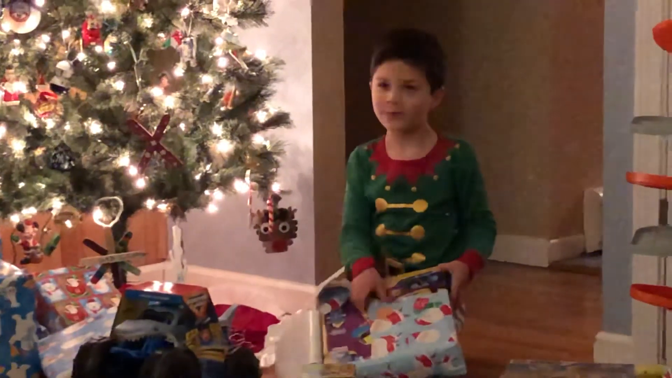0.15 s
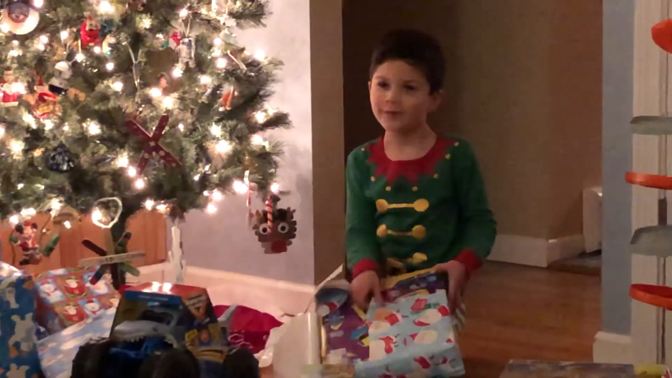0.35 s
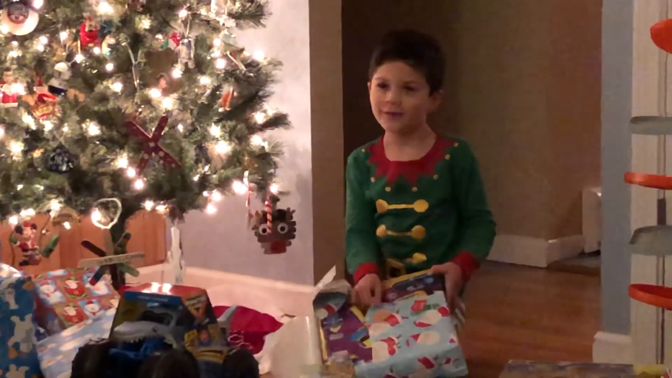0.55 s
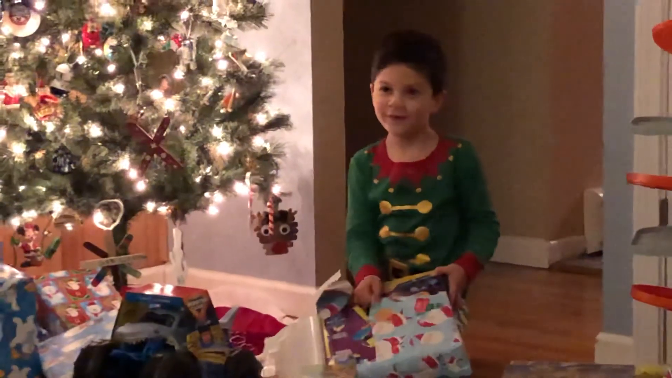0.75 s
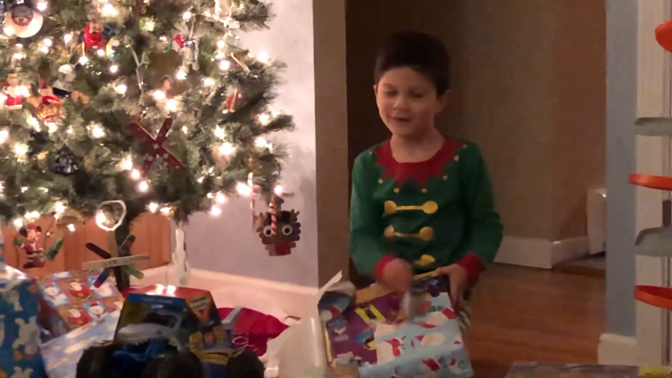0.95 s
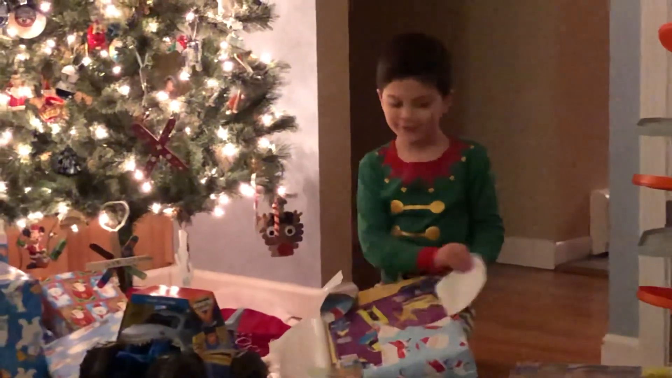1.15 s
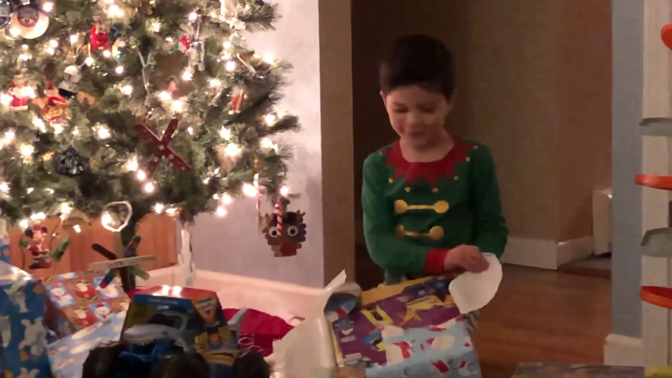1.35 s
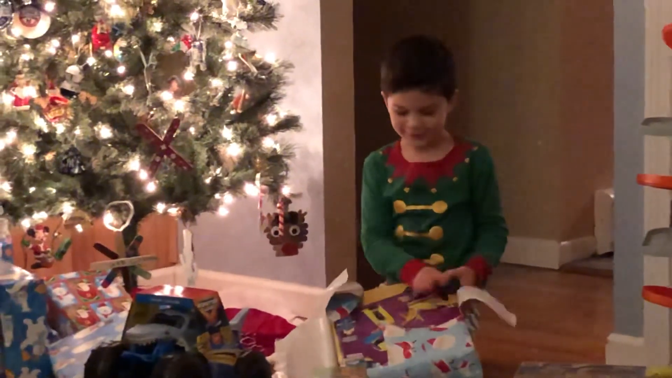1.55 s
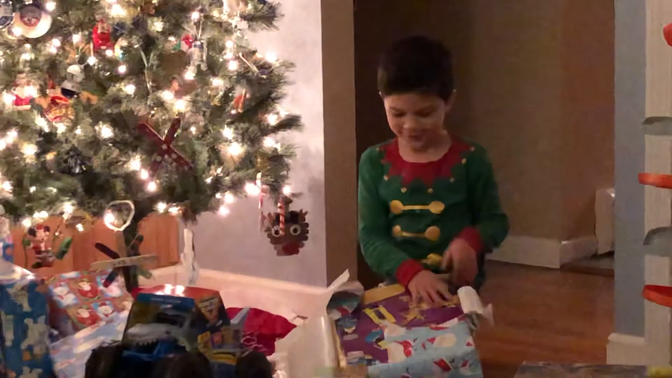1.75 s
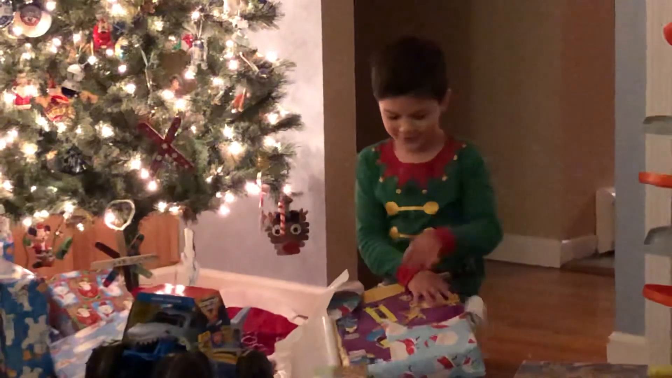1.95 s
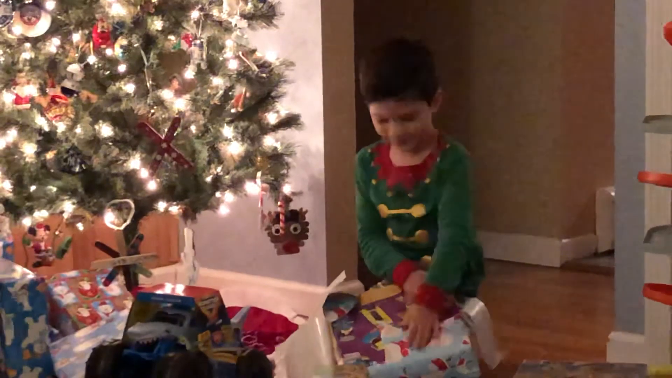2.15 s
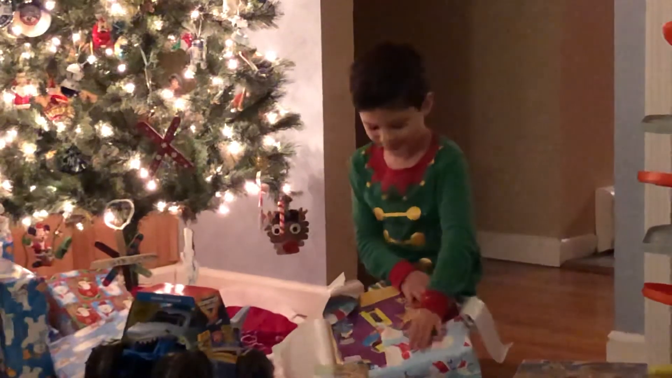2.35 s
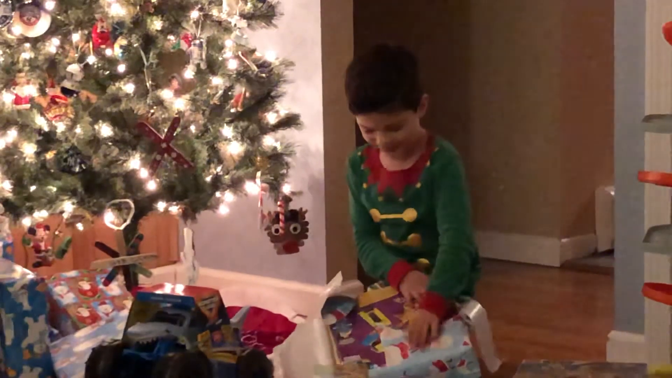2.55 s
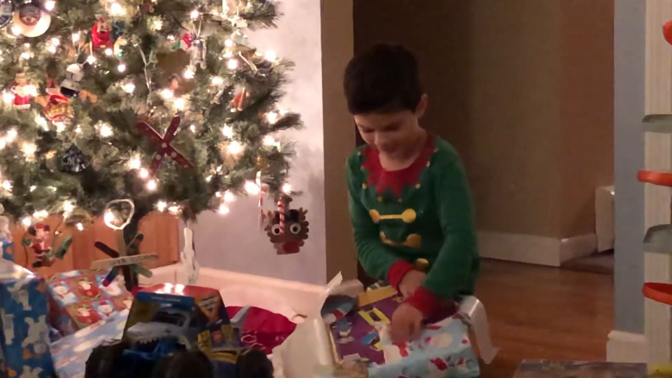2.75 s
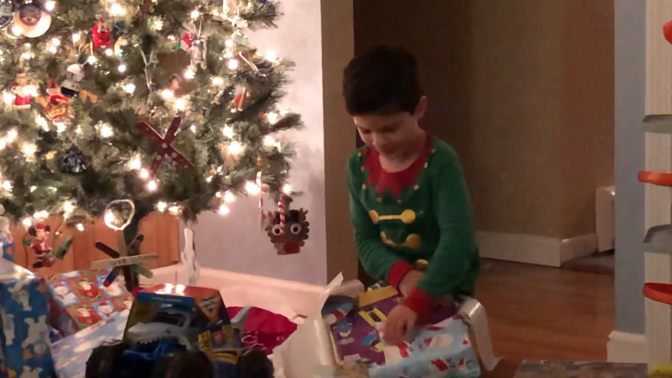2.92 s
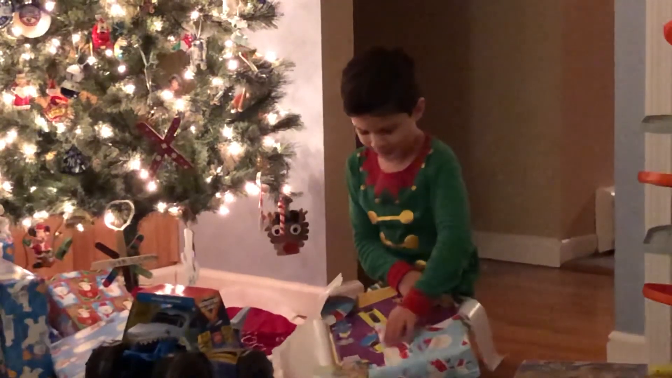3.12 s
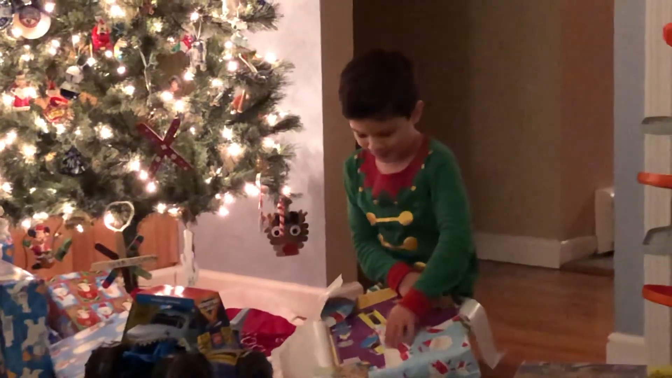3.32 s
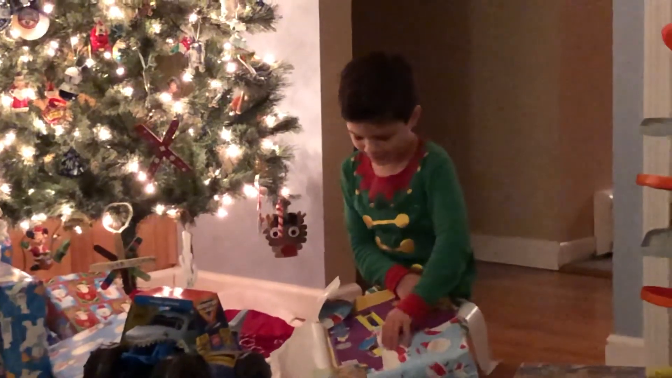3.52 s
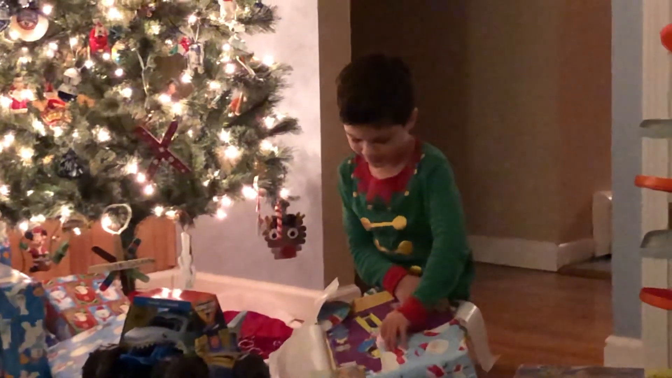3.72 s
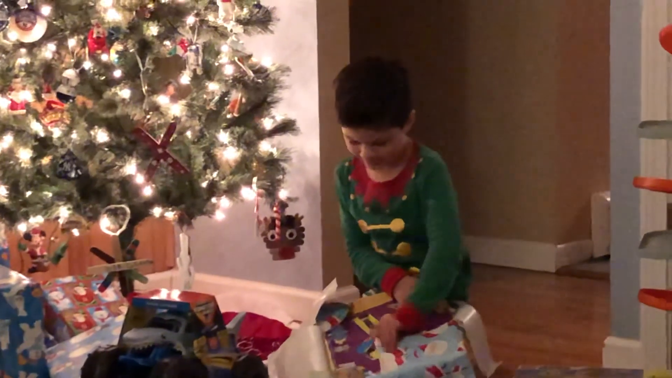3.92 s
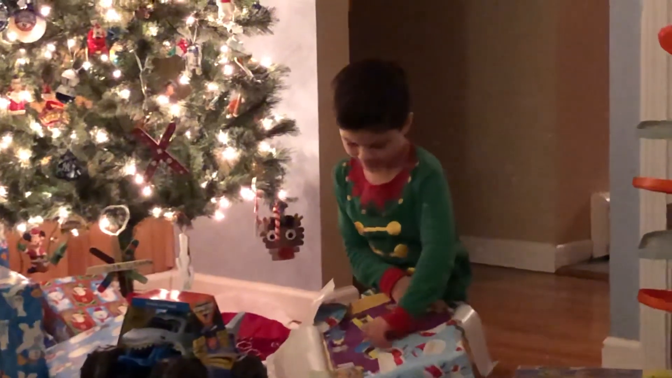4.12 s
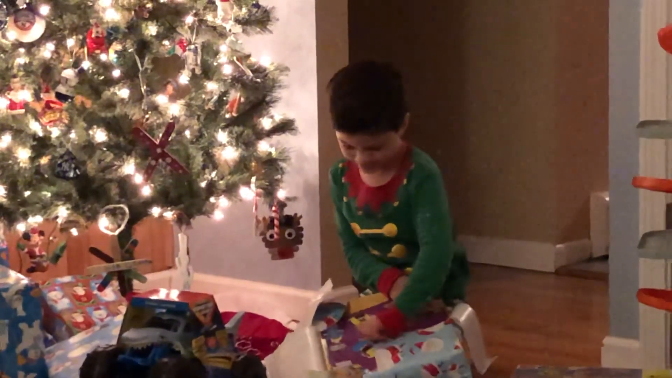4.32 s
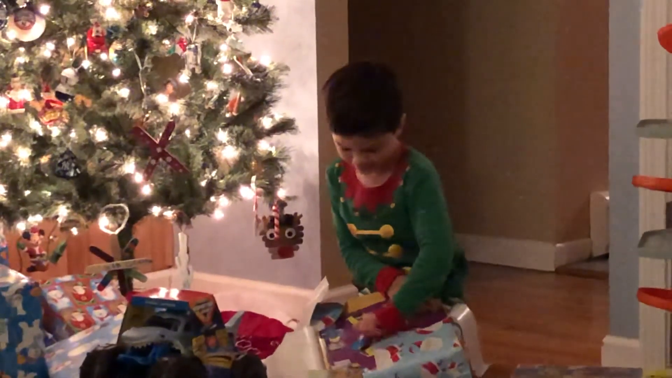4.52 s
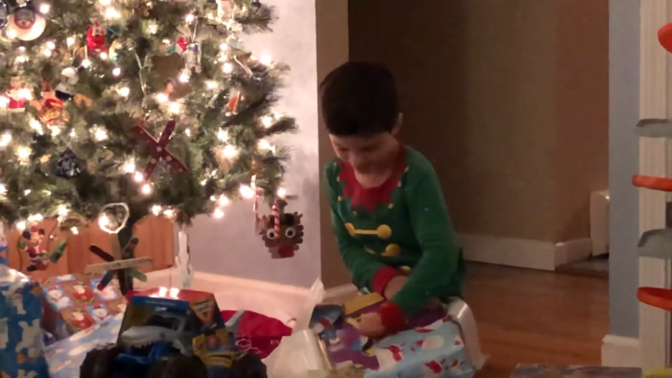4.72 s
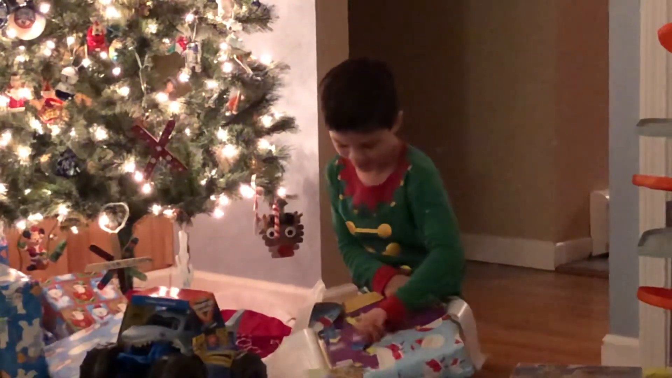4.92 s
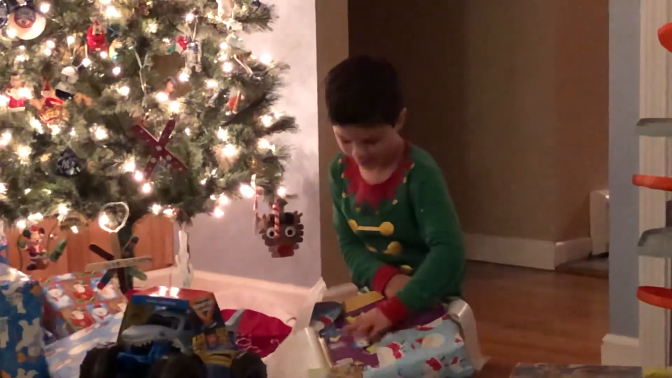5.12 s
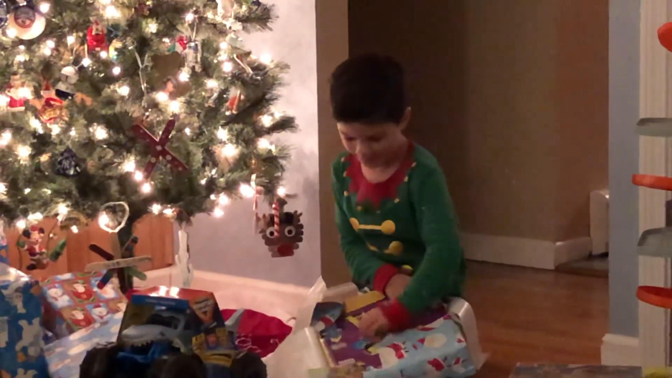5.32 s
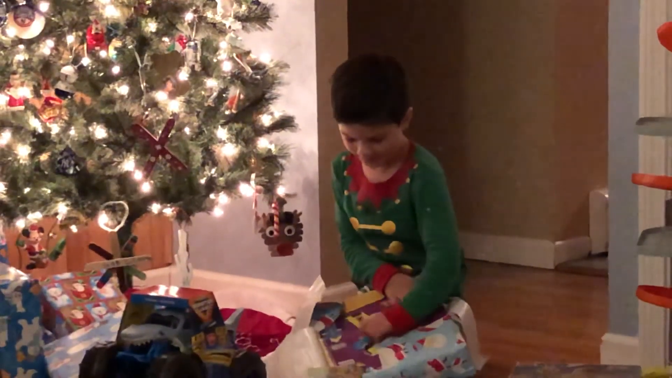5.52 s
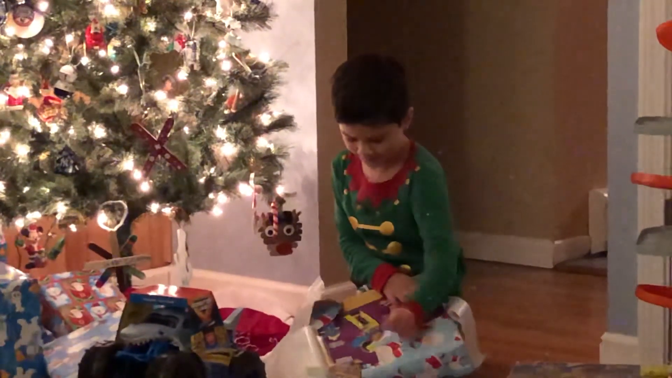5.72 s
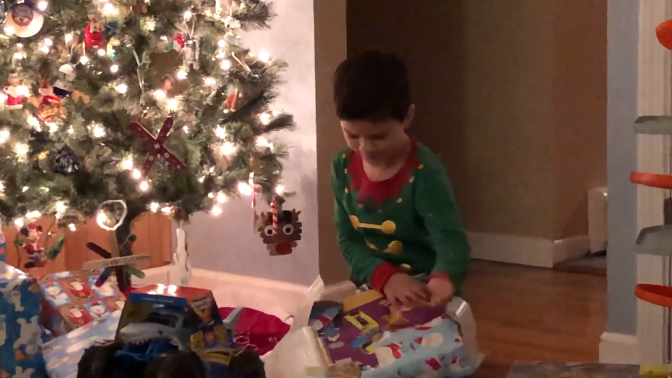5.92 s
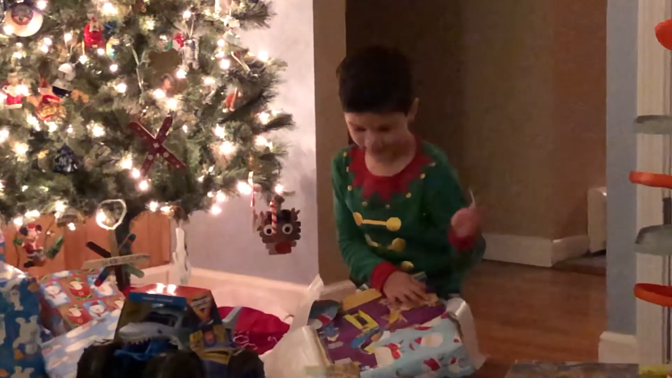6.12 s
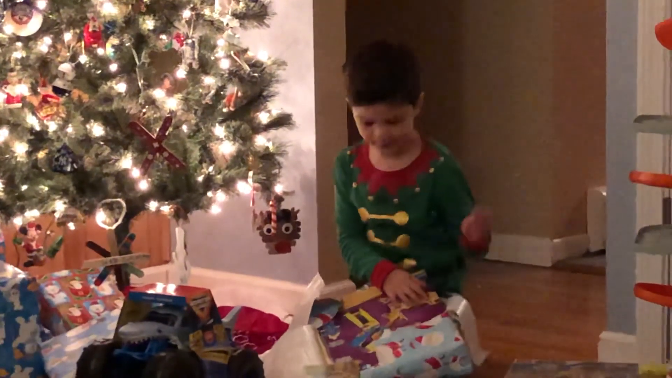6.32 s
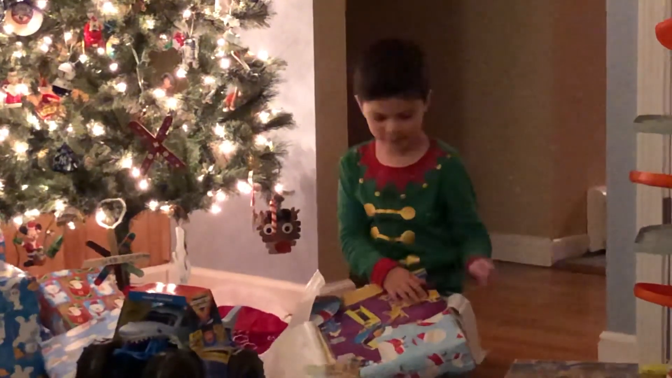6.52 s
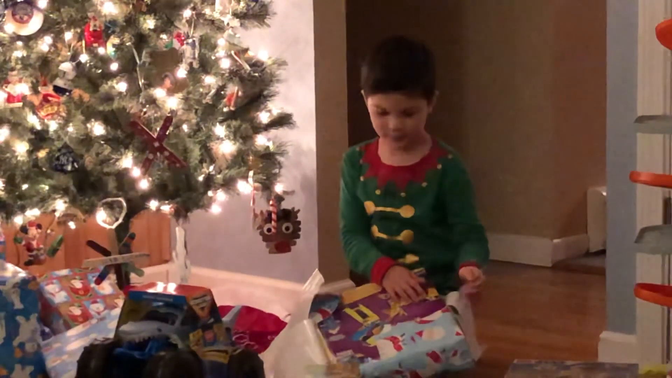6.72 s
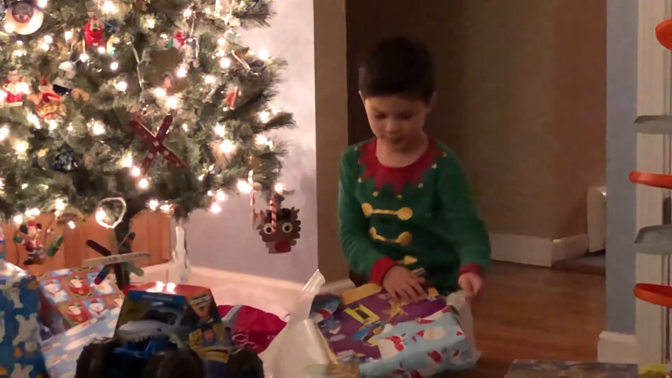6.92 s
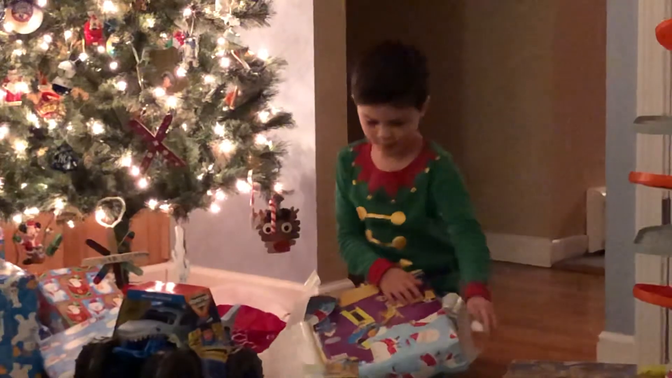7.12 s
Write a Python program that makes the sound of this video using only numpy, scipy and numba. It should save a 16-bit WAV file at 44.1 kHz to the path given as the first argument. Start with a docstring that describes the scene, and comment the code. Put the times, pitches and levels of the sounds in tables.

```python
"""Paper rips, peels and pops as a child unwraps a cardboard box on the floor of a quiet living room.
One fast rip, some fumbling, a slow strip peeled off the lid, then taut paper gives way with a pop.
Breaking fibres are trains of random clicks, and buckling creases are short bursts, both through filters.
Fingers scuff, chirp and judder by stick-slip friction; the hollow box rumbles and thuds in its modes.
Paper and fingers sound in a reverberant room, over steady soft noise."""
import sys
import numpy as np
from scipy import signal
from scipy.fft import rfft, irfft
from scipy.io import wavfile
from scipy.ndimage import uniform_filter1d
from numba import njit

SR = 44100
rng = np.random.default_rng(int(sys.argv[2]) if len(sys.argv) > 2 else 0)


def master(y):
    """Save y as 16-bit WAV."""
    cut = np.clip(np.atleast_2d(y).T, -1, 1)
    pcm = np.round(cut * 32767)  # scale
    wavfile.write(sys.argv[1], SR, pcm.astype(np.int16))


N = 315756  # length in samples


def from_db(db):
    """Logarithmic level: decibels become an amplitude gain."""
    return 10 ** (np.asarray(db) / 20)


def rms_one(x):
    """Normalisation of mean power: scale to rms 1."""
    return x / np.sqrt(np.mean(x ** 2) + 1e-20)


def at_hz(points, hz):
    """Interpolation along a logarithmic frequency axis."""
    f, value = np.transpose(points)
    return np.interp(np.log(np.maximum(hz, 1)), np.log(f), value)


def drift(rate):
    """Slow random modulation: a wander of rms 1 through `rate` random points a second."""
    knots = rng.standard_normal(int(N / SR * rate) + 2)
    position = np.arange(N) / SR * rate
    return rms_one(np.interp(position, np.arange(len(knots)), knots))


def through(x, response):
    """Linear superposition: convolve with an impulse response."""
    return signal.fftconvolve(x, response)[:N]


def colour(x, spectrum, size=8192):
    """Minimum-phase filtering: a causal response of unit energy that falls away below its first point."""
    hz = np.arange(size // 2 + 1) * SR / size
    bass_fall = np.clip(hz / spectrum[0][0], 1 / 20, 1) ** 2
    gain = from_db(at_hz(spectrum, hz)) * bass_fall
    # folding the cepstrum onto positive times makes the phase minimal
    cepstrum = irfft(np.log(gain))
    cepstrum[1:size // 2] *= 2
    cepstrum[size // 2 + 1:] = 0
    response = irfft(np.exp(rfft(cepstrum)))
    return through(x, response / np.linalg.norm(response))


def ring(x, hz, t60):
    """Damped resonance: a unit click sets a sine of initial height 1 ringing."""
    r = from_db(-60 / (t60 * SR))
    w = 2 * np.pi * hz / SR
    return signal.lfilter([0, np.sin(w)], [1, -2 * r * np.cos(w), r * r], x + 1e-18)


@njit
def moving_resonance(x, hz, width):
    """Resonance with a moving centre, of gain 1; centre and width are shares of the sample rate."""
    out, state, r = np.zeros(len(x)), 0j, np.exp(-np.pi * width)
    for i in range(len(x)):
        state = state * r * np.exp(2j * np.pi * hz[i]) + x[i]
        out[i] = 2 * (1 - r) * state.real
    return out


def sing(x, pitch_hz, modes):
    """Modal resonance of paper: all its modes follow one moving pitch; rms 1."""
    voice = np.zeros(N)
    for multiple, width_hz, db in modes:
        voice += from_db(db) * moving_resonance(x + 1e-18, multiple * pitch_hz / SR, width_hz / SR)
    return rms_one(voice)


def grains(per_s, spread_db, clump_db, clump_rate, size=2200):
    """Random impulse train: uneven clicks that come in clumps, levelled to rms 1 over each 50 ms."""
    sizes = from_db(spread_db * np.minimum(rng.exponential(1, N), 4)) * rng.choice([-1, 1], N)
    born = rng.random(N) < per_s / SR
    train = born * sizes * from_db(clump_db * drift(clump_rate))
    return train / np.sqrt(np.abs(uniform_filter1d(train ** 2, size)) + 1e-6)


def clicks(times, db):
    """Impulsive excitation: one click of the given height at each time."""
    out = np.zeros(N)
    out[np.round(times * SR).astype(int)] = from_db(db)
    return out


def gestures(rows, attack_s, release_s, sag_db_per_s, level_column=2):
    """Amplitude envelope: each hand movement builds up around its start, slackens and dies away."""
    t, out = np.arange(N) / SR, np.zeros(N)
    for row in rows:
        start, length, db = row[0], row[1], row[level_column]
        live = slice(*np.searchsorted(t, [start - attack_s / 2, start + length + 10 * release_s]))
        age = t[live] - start
        hold = from_db(db - sag_db_per_s * (age - length / 2))
        rise = np.minimum(age / attack_s + .5, 1)
        decay = np.exp(-np.maximum(age - length, 0) / release_s)
        out[live] += hold * rise * decay
    return out


# Decay of the room. Each row: frequency in Hz, reverberation time t60 in s.
ROOM_DECAY = [(150, 0.3), (1000, 0.41), (4500, 0.31), (9000, 0.23), (15000, 0.18)]


def diffuse_tail(build_s, size=22000):
    """Diffuse reverberation: noise of unit energy that builds up quickly and dies sooner in the treble."""
    t, tail = np.arange(size) / SR, np.zeros(size)
    edges = np.geomspace(60, 19000, 12)
    for low, high in zip(edges, edges[1:]):
        band_pass = signal.butter(2, [low, high], "band", fs=SR, output="sos")
        band = signal.sosfilt(band_pass, rng.standard_normal(size))
        tail += band * from_db(-60 * t / at_hz(ROOM_DECAY, np.sqrt(low * high)))
    tail *= 1 - np.exp(-t / build_s)
    return tail / np.linalg.norm(tail)


# Reflections off floor and furniture. Each row: delay in s, level in dB relative to the direct sound.
REFLECTIONS = [(.0021, -53), (.0047, -13.5)]


def room(x, tail_db, move_hz, count=4):
    """Reflection and reverberation: the paper moves, so the pattern of its reflections keeps changing."""
    shares = np.array([drift(move_hz) for _ in range(count)])
    shares /= np.linalg.norm(shares, axis=0)
    tail = from_db(tail_db) * sum(through(x * share, diffuse_tail(build_s=0.0013)) for share in shares)
    early = sum(from_db(db) * np.pad(x, (round(delay * SR), 0))[:N] for delay, db in REFLECTIONS)
    power = 1 + from_db(tail_db) ** 2 + sum(from_db(db) ** 2 for _, db in REFLECTIONS)
    return (x + early + tail) / np.sqrt(power)


# Colour of the background. Each row: frequency in Hz, relative spectral level in dB per Hz.
AIR_COLOUR = [(25, -9), (55, 0), (95, -2.5), (130, 0), (230, -1), (320, -5.5), (700, -12.5), (1100, -15),
              (2300, -21.5), (3700, -22.5), (8000, -28.5), (16000, -31.5)]
AIR_DB = -66.4  # level of the filtered noise


def still_air():
    """Stationary random noise: a steady soft background, strongest in the bass."""
    return from_db(AIR_DB) * colour(rng.standard_normal(N), AIR_COLOUR)


# Loose paper shifting under the hands. Each row: start in s, length in s, relative level in dB.
PAPER_SHIFTS = [(0.0, 0.28, -75), (0.18, 0.021, -67), (0.29, 0.15, -70), (0.645, 0.043, -79),
                (0.726, 0.02, -59), (1.35, 0.32, -82.5), (2.08, 0.1, -77), (2.25, 0.085, -70.5),
                (3.1, 0.037, -79), (3.45, 0.18, -84), (3.602, 0.022, -61.5), (4.5, 0.18, -75.5),
                (4.872, 0.023, -64), (4.95, 0.07, -74.5), (5.192, 0.0063, -56.5), (5.257, 0.071, -60.5),
                (5.32, 0.11, -75)]
# Colour of the brushing. Each row: frequency in Hz, relative spectral level in dB per Hz.
LOOSE_PAPER = [(900, 0.5), (1800, -3), (3000, -2), (4600, 2.5), (7000, -1), (10000, -4.5), (16000, -10.5)]


def rustle():
    """Granular friction: loose paper brushes against itself in fine grains."""
    brushing = grains(per_s=2200, spread_db=3.8, clump_db=2.2, clump_rate=60)
    shifting = gestures(PAPER_SHIFTS, attack_s=0.044, release_s=0.01, sag_db_per_s=0)
    return from_db(5.0) * colour(shifting * brushing, LOOSE_PAPER)


# Fingers sliding over the lid. Each row: start in s, length in s, relative level of the lid's drone in dB,
# relative level of the scuff in dB.
FINGER_STROKES = [(0.0, 0.0081, -68, -64.5), (0.063, 0.012, -64, -65.5), (0.16, 0.022, -66.5, -61),
                  (0.58, 0.33, -72.5, -70), (0.732, 0.028, -51.5, -51), (0.79, 0.36, -64, -61),
                  (1.13, 0.04, -58.5, -61), (1.37, 0.014, -67.5, -70.5), (1.545, 0.025, -68.5, -68),
                  (1.96, 0.095, -77.5, -77), (2.084, 0.058, -65.5, -65.5), (2.21, 0.025, -59.5, -66),
                  (2.312, 0.016, -59.5, -57.5), (2.37, 0.063, -74.5, -79), (3.14, 0.056, -76, -70.5),
                  (3.194, 0.011, -60.5, -59.5), (3.23, 0.035, -70, -80), (3.49, 0.091, -56.5, -62.5),
                  (3.665, 0.083, -59.5, -58.5), (3.78, 0.1, -63, -68), (3.895, 0.034, -58.5, -59),
                  (3.97, 0.16, -67.5, -68.5), (4.265, 0.1, -71, -67), (4.335, 0.098, -65, -68.5),
                  (4.49, 0.031, -58, -61), (4.55, 0.099, -62.5, -66), (4.872, 0.033, -75, -69),
                  (5.265, 0.29, -71, -69), (5.69, 0.019, -86, -72), (5.83, 0.0069, -63, -73),
                  (6.945, 0.059, -79, -66)]
# Colours of the lid and of the scuff. Each row: frequency in Hz, relative spectral level in dB per Hz.
LID_COLOUR = [(220, -12.5), (340, -1.5), (450, -11), (590, 1.5), (700, -1.5), (850, -4.5), (1200, -32.5),
              (3000, -45)]
SCUFF_COLOUR = [(600, -14), (900, -7.5), (1150, 1), (1700, -5), (2200, -12), (4000, -19), (9000, -35)]


def rub():
    """Stick-slip friction: fingers scuff the paper, and the lid drones as they press on it."""
    slips = grains(per_s=500, spread_db=4, clump_db=4, clump_rate=60)
    pressing = gestures(FINGER_STROKES, attack_s=0.052, release_s=0.022, sag_db_per_s=7, level_column=2)
    sliding = gestures(FINGER_STROKES, attack_s=0.036, release_s=0.017, sag_db_per_s=8, level_column=3)
    drone = from_db(4.5) * colour(pressing * slips, LID_COLOUR)
    scuff = from_db(2.7) * colour(sliding * slips, SCUFF_COLOUR)
    return drone + scuff


# Creases buckling and taut paper giving way. Each row: time in s, relative level of the snap in dB,
# of its dull part in dB, of its crisp part in dB, ringing frequency of the facet in Hz.
CREASE_SNAPS = [(0.18, -46.5, -62, -46.5, 4490), (0.1855, -51, -62, -67, 4470),
                (0.5274, -59.5, -70, -79, 4540), (0.634, -43, -58, -71, 3780),
                (0.739, -34.5, -44.5, -36, 3470), (1.4474, -63.5, -82, -81, 3600),
                (1.7679, -64.5, -63, -84, 1400), (1.7985, -80, -63.5, -84, 1400),
                (1.8178, -63, -68, -86, 1410), (1.9146, -65, -61, -81, 1490), (1.97, -66, -67, -80, 2000),
                (2.078, -49, -84, -63, 1400), (2.094, -51.5, -57.5, -74, 1490),
                (2.0976, -53, -69, -69, 5200), (2.1355, -51, -65, -70, 3500),
                (2.203, -43, -48.5, -62, 2970), (2.208, -57, -57, -63, 1600),
                (2.2226, -61, -53.5, -68, 1500), (2.237, -46, -56, -51, 4460),
                (2.2422, -61, -61, -72, 6360), (2.463, -65, -78, -82, 4000), (2.606, -67, -83, -70, 3650),
                (2.6326, -58, -68, -62.5, 3650), (3.1898, -57, -58, -80, 1820),
                (3.203, -59, -56.5, -79, 1700), (3.4323, -48.5, -54.5, -54.5, 4470),
                (3.6026, -49, -68, -47, 3980), (3.607, -54, -73, -49.5, 3400),
                (3.7323, -49.5, -59, -54, 3700), (3.7794, -47.5, -62, -47, 7020),
                (3.84, -52, -66, -43, 5250), (3.897, -44.5, -62, -52, 4200), (3.914, -44, -53.5, -48, 3380),
                (3.957, -41.5, -57, -42, 3340), (3.971, -44, -64, -60, 2100),
                (4.057, -41.5, -55, -58, 4400), (4.27, -44, -56.5, -60, 3470),
                (4.315, -49.5, -67, -62, 4300), (4.3443, -50, -68, -54, 3900),
                (4.9425, -55, -75, -51.5, 9100), (5.25, -44, -57.5, -44.5, 4700),
                (5.2765, -45.5, -52, -62, 1470), (5.2988, -53, -66, -45, 5070),
                (5.301, -43.5, -60, -33, 7950), (5.3048, -51, -65, -46, 5340),
                (5.39, -59, -57.5, -75, 2100), (5.43, -59, -64, -78, 2200), (5.465, -61, -63, -78, 1900),
                (5.4977, -58.5, -70, -64, 3500), (5.5761, -31.5, -39.5, -27.5, 5500),
                (5.5812, -36, -39.5, -44, 5835), (5.587, -33, -42.5, -38, 4250),
                (5.8244, -55, -66, -71, 4700), (6.686, -57.5, -88, -62, 3520)]
# Colours of the three parts. Each row: frequency in Hz, relative spectral level in dB per Hz.
DULL_COLOUR = [(200, 5.5), (400, -5), (620, 0.5), (750, -0.5), (1000, -1), (1500, -1), (2300, -17.5),
               (5000, -37.5)]
SNAP_COLOUR = [(700, -10), (1800, 9.5), (2600, 3), (3400, 6), (4500, 7.5), (6000, -8.5), (8000, -5.5),
               (14000, -18)]
CRISP_COLOUR = [(3500, -32.5), (6000, 13), (7500, 14.5), (10500, 13), (13000, 7), (16000, 5.5)]


def snaps(click_db, strain_s, shiver_s, ring_db, ring_cycles, size=2400, lead=200):
    """Snap-through buckling: a crease creaks under strain, flips with a click, then shivers and rings."""
    lag = (np.arange(size) - lead) / SR  # seconds from the flip
    dull, snap, crisp, rung = np.zeros((4, N))
    envelope = np.exp(np.minimum(lag / strain_s, -lag / shiver_s))
    shivers = rng.laplace(size=(len(CREASE_SNAPS), size)) * envelope
    for (s, snap_db, dull_db, crisp_db, hz), shiver in zip(CREASE_SNAPS, shivers):
        burst = shiver / np.linalg.norm(shiver)
        burst[lead] += from_db(click_db)
        ringing = ring(np.gradient(burst), hz, ring_cycles / hz)
        burst /= np.linalg.norm(burst)
        ringing /= np.linalg.norm(ringing)
        at = round(s * SR) - lead
        here = slice(at, at + size)
        dull[here] += from_db(dull_db) * burst
        snap[here] += from_db(snap_db) * burst
        crisp[here] += from_db(crisp_db) * burst
        rung[here] += from_db(ring_db + max(snap_db, crisp_db)) * ringing
    dull = from_db(28.5) * colour(dull, DULL_COLOUR)
    snap = from_db(19.5) * colour(snap, SNAP_COLOUR)
    crisp = from_db(23.0) * colour(crisp, CRISP_COLOUR)
    return dull + snap + crisp + rung


def creases(count=3):
    """Incoherent summation: several facets flip in each snap, each sounding into the room in its own way."""
    total = np.zeros(N)
    for _ in range(count):
        facet = snaps(click_db=-7.5, strain_s=0.00095, shiver_s=0.0029, ring_db=11.5, ring_cycles=16.5)
        total += room(facet, tail_db=1.2, move_hz=3, count=2)
    return total / np.sqrt(count)


# Modes of the hollow box. Each row: frequency in Hz, relative level in dB, decay time t60 in s.
BOX_MODES = [(126.4, -3, 0.28), (147.5, 1.5, 0.17), (187.6, -4.5, 0.28), (186, 1, 0.077),
             (220.3, 3.5, 0.096), (237.1, -3.5, 0.25), (354.4, -12.5, 0.27), (440.7, -11.5, 0.22),
             (572, -11, 0.46), (608, -10, 0.22), (648, -4.5, 0.16)]


def box(push, contact_hz):
    """Modal excitation: a push rings the modes of the hollow box; a soft contact spares the high ones."""
    soft = signal.sosfilt(signal.butter(1, contact_hz, fs=SR, output="sos"), push)
    out = np.zeros(N)
    for k, (hz, db, t60) in enumerate(BOX_MODES):
        sign = (-1) ** (k // 3)
        out += sign * from_db(db) * ring(soft, hz, t60)
    return out


# Hands tugging at the box. Each row: start in s, length in s, relative level in dB.
BOX_TUGS = [(0.63, 0.029, -57.5), (0.735, 0.061, -44.5), (0.79, 0.16, -49), (1.005, 0.038, -60),
            (1.55, 0.17, -63), (2.073, 0.038, -52.5), (2.13, 0.14, -62), (2.45, 0.94, -65),
            (3.436, 0.018, -53.5), (3.52, 0.22, -53.5), (3.715, 0.14, -54.5), (3.98, 0.098, -53),
            (4.3, 0.28, -57.5), (4.56, 0.11, -57), (5.103, 0.016, -58), (5.21, 0.13, -54.5),
            (5.375, 0.011, -51.5)]


def flex():
    """Forced vibration: the pull on the paper jerks the hollow box."""
    jerks = grains(per_s=600, spread_db=1.5, clump_db=3.5, clump_rate=35)
    pulling = gestures(BOX_TUGS, attack_s=0.007, release_s=0.044, sag_db_per_s=3.0)
    return from_db(-3.0) * pulling * rms_one(box(jerks, contact_hz=470))


# Bumps on the box. Each row: time in s, relative height of the impulse in dB.
BOX_BUMPS = [(0.741, -36), (0.778, -49), (2.072, -44), (2.706, -45.5), (3.436, -43), (5.213, -40.5),
             (5.583, -23.5), (5.624, -31.5)]


def bumps():
    """Impact excitation: sudden pulls and knocks thump the box."""
    s, height_db = np.transpose(BOX_BUMPS)
    return from_db(-13.5) * box(clicks(s, height_db), contact_hz=1240)


# Colours of the breaking fibres and of the sheet. Each row: frequency in Hz, relative level in dB per Hz.
FIBRE_COLOUR = [(1500, -22), (2700, -1.5), (4300, 6), (5000, 4.5), (6200, 2.5), (7500, 2.5), (10000, -1),
                (12000, -1), (16000, -9)]
SHEET_COLOUR = [(800, -15.5), (1300, -14), (1800, -5.5), (2500, -2), (3300, -6.5), (6000, -19)]


def tear(pulls, breaks, modes, flutter, crackle_db, flap_db, flap_swell_db, sheet_db, sheet_growth_db):
    """Fracture as excitation: breaking fibres crackle, and shake the fluttering free flap and the sheet."""
    t, effort, progress = np.arange(N) / SR, np.zeros(N), np.zeros(N)
    for rows in pulls:
        s, db, _ = np.transpose(rows)
        during = (t >= s[0]) & (t < s[-1])
        effort[during] = from_db(np.interp(t[during], s, db))
        progress[during] = (t[during] - s[0]) / (s[-1] - s[0])
    s, _, hz = np.vstack(pulls).T
    pitch_hz = np.interp(t, s, hz) * (1 + flutter * drift(30))
    flap = sing(breaks, pitch_hz, modes)
    crackle = from_db(crackle_db) * colour(breaks, FIBRE_COLOUR)
    # the flap's strength changes in mid-pull
    singing = from_db(flap_db + flap_swell_db * np.sin(np.pi * progress)) * flap
    # the sheet gains body as more of it comes free
    body = from_db(sheet_db + sheet_growth_db * progress) * colour(breaks, SHEET_COLOUR)
    return effort * (crackle + singing + body)


# The fast rip, one list per pull. Each row: time in s, relative level in dB, pitch of the free flap in Hz.
RIP_PULL = [
    [(0.742, -41, 3500), (0.768, -37.5, 3680), (1.066, -41, 3630), (1.188, -46.5, 3600), (1.24, -72, 3400)],
]
# Resonances of the wide flap. Each row: multiple of the pitch, width in Hz, relative level in dB.
FLAP_MODES = [(0.87, 304, -5), (0.99, 340, 0), (1.1, 300, 0.5)]


def rip():
    """Dense fracture: in a fast tear thousands of fibre breaks a second merge into a rasp."""
    breaks = grains(per_s=3500, spread_db=3.8, clump_db=2.4, clump_rate=170)
    return tear(RIP_PULL, breaks, FLAP_MODES, flutter=0.019, crackle_db=1.5,
                flap_db=-8.0, flap_swell_db=10.5, sheet_db=-14.5, sheet_growth_db=10.5)


# Skids of a fingertip along the papered edge. Each row: start in s, length in s, relative level in dB,
# pitch in Hz.
EDGE_SKIDS = [(2.323, 0.026, -55.5, 790), (3.19, 0.026, -57.5, 1150), (6.944, 0.011, -59.5, 950),
              (6.973, 0.0078, -51, 943), (6.998, 0.017, -60, 790), (7.021, 0.0073, -58, 965),
              (7.031, 0.0096, -65, 764), (7.072, 0.0074, -71, 993)]
# Resonances of that edge. Each row: multiple of the pitch, width in Hz, relative level in dB.
EDGE_MODES = [(1, 130, 11), (1.65, 350, -6), (2.15, 350, -15), (3.1, 900, -26)]


def skid():
    """Friction locked to a resonance: the fingertip slips in step with the ringing edge, a gritty chirp."""
    s, length, _, hz = np.transpose(EDGE_SKIDS)
    # steady within each skid
    pitch_hz = np.interp(np.arange(N) / SR, np.ravel([s, s + length], "F"), np.repeat(hz, 2))
    slip_hz = pitch_hz * (1 + .04 * drift(400))
    slips = np.sin(2 * np.pi * np.cumsum(slip_hz) / SR)
    grit = grains(per_s=2500, spread_db=2, clump_db=1, clump_rate=60)
    chirp = sing(from_db(-15.5) * slips + grit, pitch_hz, EDGE_MODES)
    return from_db(1.0) * gestures(EDGE_SKIDS, attack_s=0.0079, release_s=0.004, sag_db_per_s=12) * chirp


# Two slow pulls, one list each; in the first the strip sings lower as it grows longer.
# Each row: time in s, relative level in dB, pitch of the strip in Hz.
PEEL_PULLS = [
    [(3.63, -73, 6400), (3.662, -68.5, 6440), (3.77, -57.5, 6200), (3.792, -50, 5900), (3.845, -52.5, 5260),
     (3.9, -51, 4050), (3.976, -52.5, 2130), (4.018, -53, 2050), (4.055, -55, 2000), (4.1, -58, 2150),
     (4.175, -92, 2150)],
    [(4.215, -68, 3800), (4.261, -57.5, 3700), (4.269, -56, 3600), (4.293, -54.5, 3700), (4.351, -59, 3900),
     (4.42, -85, 3900)],
]
# Resonances of the narrow strip. Each row: multiple of the pitch, width in Hz, relative level in dB.
STRIP_MODES = [(1, 523, 7), (2.3, 900, -5)]


def peel():
    """Sparse fracture: in a slow tear fewer fibres break at a time, so single breaks stand out."""
    breaks = grains(per_s=1100, spread_db=4.8, clump_db=4.4, clump_rate=70)
    return tear(PEEL_PULLS, breaks, STRIP_MODES, flutter=.03, crackle_db=-2.5,
                flap_db=-3.0, flap_swell_db=-5.5, sheet_db=-23.5, sheet_growth_db=27.0)


# A finger juddering across the lid in an even run. One row: start in s, slips per s, relative level in dB.
JUDDER_RUN = (4.513, 34.5, -53)


def judder(count=7):
    """Periodic stick-slip: every slip knocks lid, paper and box; the run swells and fades."""
    start, per_s, db = JUDDER_RUN
    k = np.arange(count)
    height_db = db + 4 * np.sin(np.pi * k / count) + rng.normal(0, 1, count)
    slips = clicks(start + k / per_s, height_db)
    knock = from_db(14.0) * colour(slips, LID_COLOUR)
    scuff = from_db(8.5) * colour(slips, SCUFF_COLOUR)
    thump = from_db(-14) * box(slips, contact_hz=900)
    return knock + scuff + thump


def scene():
    """Superposition of sources: paper and fingers in the room, the box, and the still air."""
    tearing = room(rip() + peel() + rustle(), tail_db=2.5, move_hz=9)
    fingers = room(rub() + judder(), tail_db=-2.5, move_hz=5)
    chirps = room(skid(), tail_db=-7, move_hz=5, count=1)
    return (tearing + creases() + fingers + chirps + flex() + bumps() + still_air())[None]


CUTOFF_HZ = 16100  # upper band limit


def record(dry):
    """Band limitation: the microphone drops the deep bass; the top is cut steeply."""
    thin = signal.sosfilt(signal.butter(4, 42, "high", fs=SR, output="sos"), dry)
    return signal.sosfilt(signal.ellip(12, .1, 80, CUTOFF_HZ, fs=SR, output="sos"), thin)


dry = scene()
out = record(dry)
master(out)
```